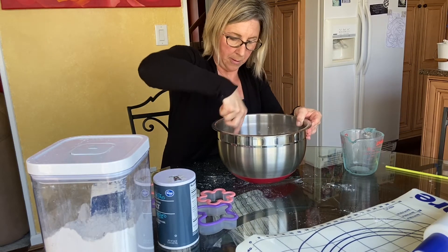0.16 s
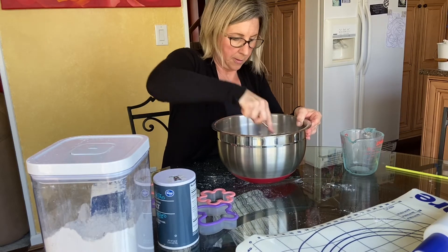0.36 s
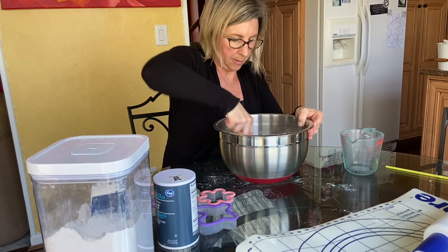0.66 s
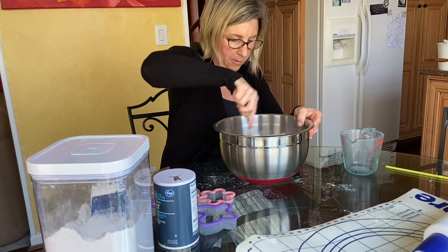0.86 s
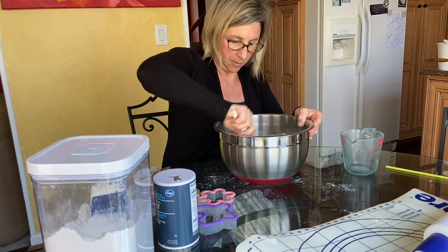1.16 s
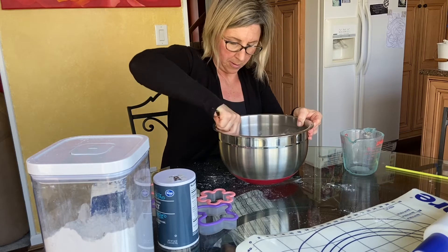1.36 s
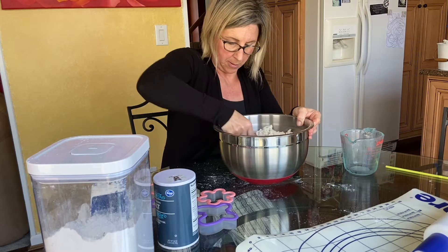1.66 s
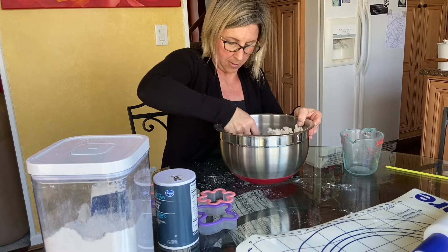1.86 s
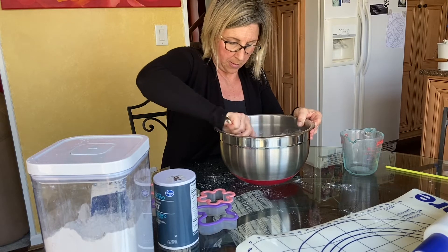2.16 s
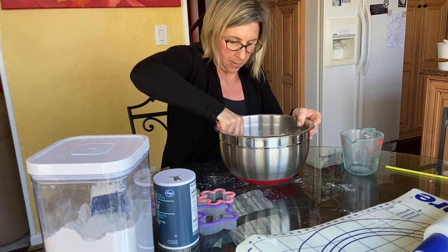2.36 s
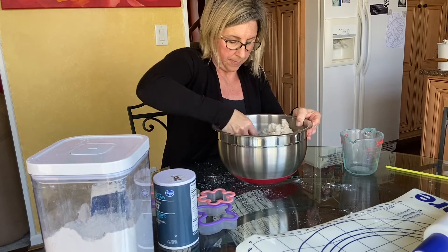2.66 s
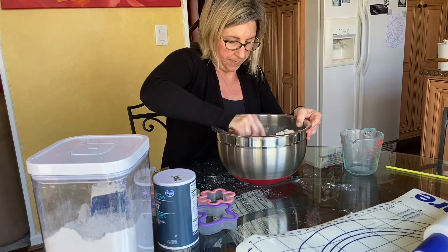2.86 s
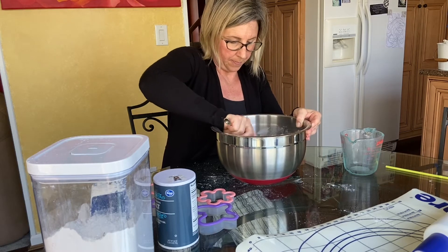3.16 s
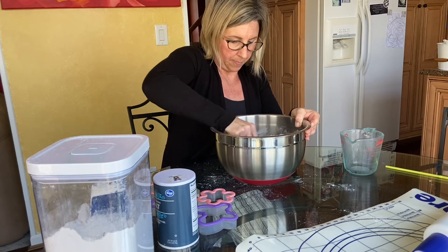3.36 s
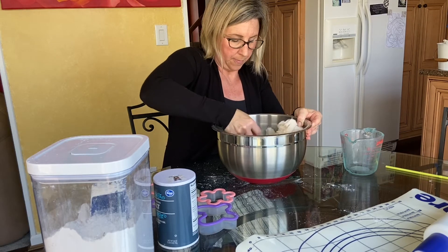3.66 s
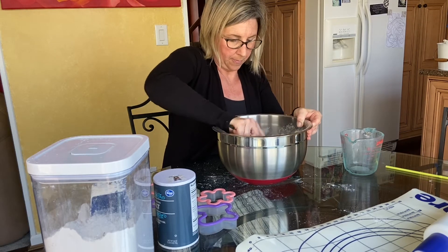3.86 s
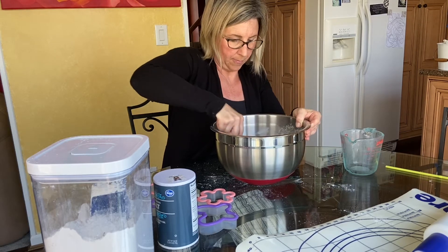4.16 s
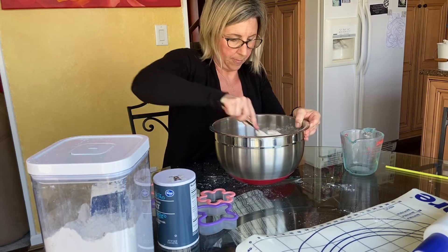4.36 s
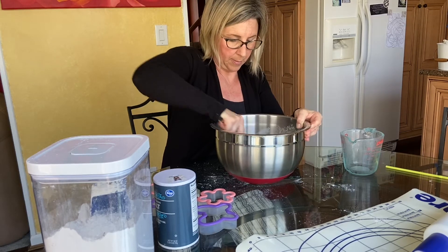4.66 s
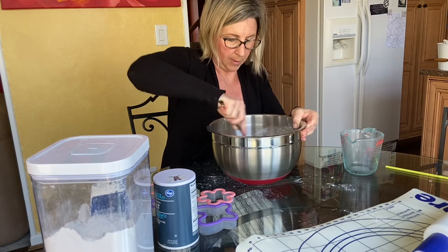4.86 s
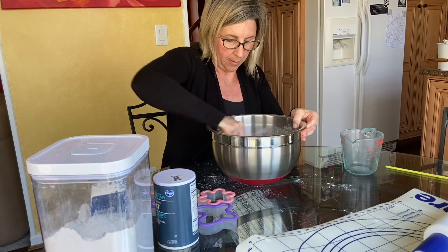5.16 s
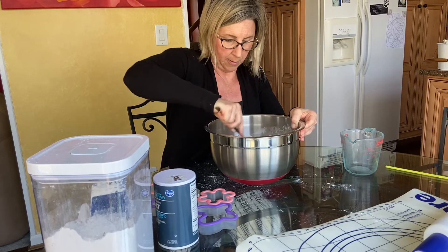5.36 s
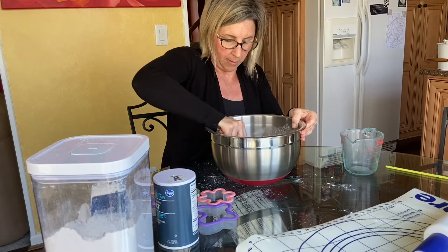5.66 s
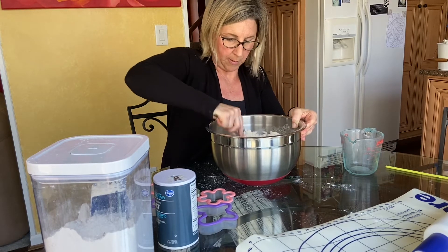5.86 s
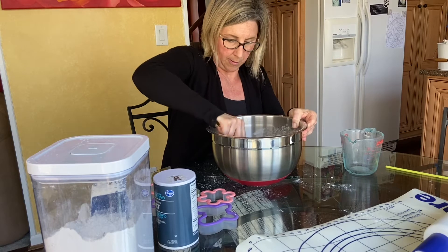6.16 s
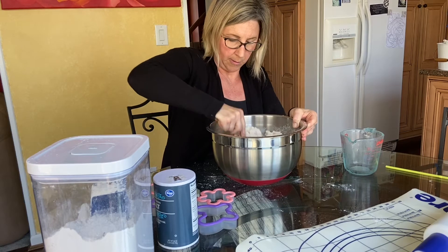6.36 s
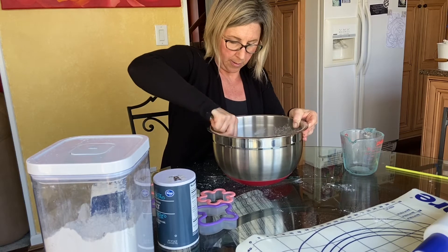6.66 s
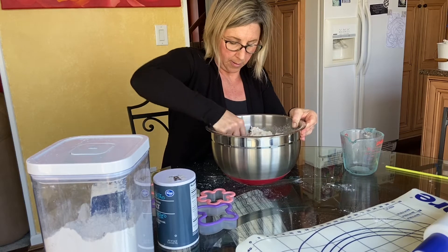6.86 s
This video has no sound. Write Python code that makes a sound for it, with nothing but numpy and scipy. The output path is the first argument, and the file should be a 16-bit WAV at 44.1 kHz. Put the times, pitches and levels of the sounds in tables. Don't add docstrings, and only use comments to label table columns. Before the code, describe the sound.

Gritty metallic scrapes and clanks of a spoon stirring stiff dough in a metal bowl, pausing between strokes, over faint fridge hum.

```python
import sys
import numpy as np
from scipy import signal
from scipy.fft import rfft, irfft
from scipy.io import wavfile
from scipy.ndimage import uniform_filter1d

SR = 44100
rng = np.random.default_rng(int(sys.argv[2]) if len(sys.argv) > 2 else 0)


def undo_db(level):
    steps = np.asarray(level, float) / 20
    return 10 ** steps


def wav_record(signal):
    frames = np.transpose(np.atleast_2d(signal))
    bounded = np.clip(frames, -1, 1)
    quanta = np.round(bounded * 32767).astype(np.int16)
    wavfile.write(sys.argv[1], SR, quanta)


N = 308259


def evened(x):
    return x / np.sqrt(np.mean(x ** 2) + 1e-20)


def read(points, hz):
    f, value = np.transpose(points)
    return np.interp(np.log(hz + 1), np.log(f + 1), value)


def add(mix, start_s, sound):
    part = mix[..., round(start_s * SR):][..., :sound.shape[-1]]
    part += sound[..., :part.shape[-1]]


def band(x, lo_hz, hi_hz):
    return signal.sosfilt(signal.butter(4, [lo_hz, hi_hz], "band", fs=SR, output="sos"), x)


def colour(points):
    gain_db = np.maximum(read(points, abs(np.fft.fftfreq(4096, 1 / SR))), -100)
    log_gain = np.log(undo_db(gain_db))
    return np.fft.ifft(np.exp(np.conj(signal.hilbert(log_gain)))).real[:2048]


# frequency in Hz, level in dB per Hz.
GRIT_BODY = [(3000, -15), (4400, 1), (5300, 6), (5500, 9.5), (6200, 12.5), (7200, 8), (8500, 0),
             (8850, -47)]
# frequency in Hz, width in Hz, level in dB.
HIGH_WALL_MODES = [(5440, 90, 3), (5560, 60, -2), (5770, 70, 3), (5900, 60, -2), (6040, 60, 4),
                   (6205, 45, 4), (6340, 60, 0), (6495, 50, 1), (6775, 90, 2), (7050, 80, 0),
                   (7200, 80, -1), (7420, 90, 0), (7650, 100, -1), (7900, 120, 0)]
# frequency in Hz, level in dB per Hz.
DRAG_BODY = [(200, -30), (350, -2), (550, 0), (800, 1.5), (1200, 3), (1700, -1), (2200, 3), (3000, -0.5),
             (4000, 0.5), (5500, -0.5), (9000, -11.5)]
# frequency in Hz, width in Hz, level in dB.
LOW_WALL_MODES = [(405, 45, 0), (495, 35, 1), (602, 35, 1), (725, 40, 1), (790, 50, -3), (900, 40, -4),
                  (1035, 30, 0), (1325, 60, 1), (1530, 40, -4), (2030, 55, 3), (2345, 70, 2), (2920, 60, 0),
                  (3400, 80, -3), (4160, 60, 1)]
# frequency in Hz, level in dB per Hz.
SPOON_METAL = [(3600, -24), (4450, -9), (4620, 5), (5000, -2), (5800, -30)]
# frequency in Hz, width in Hz, level in dB.
SPOON_MODES = [(4600, 90, -2), (4700, 70, 1), (4830, 110, -3), (4990, 130, -5)]
# frequency in Hz, level in dB per Hz.
FINE_GRIT = [(7500, -65.5), (8500, 4.5), (11000, -2), (13000, -2), (15700, -3), (15950, -83)]
# frequency in Hz, level in dB per Hz.
DUST_BODY = [(5500, -39), (6600, -3.5), (7300, 5), (8100, -2), (8500, -17), (9000, -78)]


def strokes():
    grit_db, drag_db, fine_db, spoon_db, dust_db, hardness_db = controls()
    salt = grains(14000, 2.5, 2.6, 0.006)
    grit_wall = wall(GRIT_BODY, HIGH_WALL_MODES, -2.3, uneven_db=9.5, count=4)
    grit = rub(salt, grit_db + 0.5, grit_wall, 5570, 6850)
    spoon_metal = wall(SPOON_METAL, SPOON_MODES, -5, count=2)
    spoon = rub(np.roll(salt, 99), spoon_db - 2.5, spoon_metal, 4400, 5100)

    lumpy = grains(7000, 2.4, 2.1, 0.0071)
    drag_wall = wall(DRAG_BODY, LOW_WALL_MODES, -6, uneven_db=3, count=4)
    drag = rub(lumpy, drag_db + 4, drag_wall, 700, 3800)
    soft = signal.lfilter(*signal.butter(1, 1500, fs=SR), drag)
    drag = undo_db(-hardness_db) * soft + undo_db(hardness_db) * (drag - soft)

    fine = rub(salt, fine_db + 0.37, np.tile(colour(FINE_GRIT), (2, 1, 1)), 8370, 16600)
    dust_wall = wall(DUST_BODY, HIGH_WALL_MODES, -15, count=2)
    grit += rub(np.roll(salt, 333), dust_db + 9.5, dust_wall, 6000, 9000)
    return damped(grit + spoon + drag, patchy_db=2.1), fine


# start, rise, hold and lift in seconds, grit level in dB.
EDGE_SCRAPES = [(.427, 0.0077, 0.0057, 0.13, -30.5), (1.163, 0.045, .002, 0.15, -40.5),
                (1.24, 0.11, 0.37, .15, -50), (1.66, 0.058, .002, 0.066, -45),
                (2.262, 0.019, 0.039, 0.12, -45), (2.30, 0.074, .002, 0.032, -34),
                (2.385, .012, 0.035, 0.083, -45.5), (2.45, 0.097, 0.03, 0.2, -33.5),
                (3.243, 0.018, 0.0022, 0.6, -43.5), (3.39, 0.0031, 0.048, 0.14, -44.5),
                (3.47, 0.075, 0.0051, 0.09, -37.5), (3.986, 0.0019, 0.13, 0.059, -51.5),
                (4.507, 0.0045, 0.03, 0.04, -47), (4.58, 0.02, 0.12, 0.058, -54),
                (5.033, 0.018, 0.033, .05, -42.5), (5.06, 0.022, .005, 0.15, -35.5),
                (5.15, 0.031, 0.084, 0.086, -45), (5.487, .002, 0.06, .03, -66),
                (5.572, 0.003, 0.078, 0.11, -36.5), (5.70, 0.0099, 0.093, 0.11, -46.5),
                (6.056, 0.014, 0.061, .1, -36), (6.13, 0.03, 0.078, 0.3, -37.5),
                (6.574, 0.019, 0.0016, 0.11, -32), (6.64, 0.021, 0.033, 0.11, -40)]
# start, rise, hold and lift in seconds, drag level in dB.
WEIGHT_PRESSES = [(.427, 0.0048, 0.024, 0.071, -36.5), (.5, .012, 0.046, 0.67, -63),
                  (1.163, 0.005, 0.54, 0.074, -59.5), (2.25, 0.039, 0.0093, 0.24, -40.5),
                  (2.39, 0.018, 0.18, 0.17, -53), (3.243, 0.013, 0.0018, 0.38, -43),
                  (3.39, 0.0034, 0.13, 0.18, -49.5), (3.987, 0.0047, 0.093, 0.1, -45),
                  (4.511, 0.0084, 0.0017, 0.063, -51), (4.57, 0.069, 0.057, 0.063, -46),
                  (5.036, 0.096, 0.055, 0.16, -46), (5.58, 0.057, 0.058, 0.19, -46),
                  (6.06, 0.081, 0.039, 0.23, -41.5), (6.6, 0.031, 0.058, 0.11, -46.5)]
# start, rise, hold and lift in seconds, ring level in dB.
SPOON_SINGS = [(.427, 0.021, .002, 0.066, -25), (1.42, 0.05, 0.24, .05, -51.5),
               (2.4, 0.066, 0.06, 0.068, -38), (3.243, 0.032, .002, 0.1, -35.5),
               (3.39, .012, 0.15, 0.17, -46.5), (3.987, .003, .002, .1, -59),
               (4.58, 0.033, 0.05, 0.045, -51), (5.05, 0.03, .01, 0.12, -36), (5.18, 0.026, .002, .05, -41),
               (5.25, 0.022, .002, 0.026, -38.5), (5.6, 0.018, 0.023, 0.23, -44),
               (6.12, 0.0058, 0.06, 0.24, -32.5)]


def controls():
    t = np.arange(0, N / SR + 0.001, 0.001)
    edge = contact(EDGE_SCRAPES, t, onset_db=-15)
    weight = contact(WEIGHT_PRESSES, t, onset_db=-16)
    sing = contact(SPOON_SINGS, t, onset_db=-15)
    loose, dust = slides(t)

    grit = edge + loose + undo_db(-82) ** 2
    light = loose * undo_db(-14.5) ** 2 + undo_db(-86) ** 2
    firm_db, fine_slope_db_per_db = -43.5, 0.98
    fine = (edge / undo_db(firm_db) ** 2) ** fine_slope_db_per_db * undo_db(firm_db - 13.5) ** 2
    fine = fine + weight * undo_db(-41) ** 2 + dust
    spoon = sing + grit * undo_db(-15) ** 2
    press_hard_db, slide_hard_db = -4.5, -8
    hard_db = (weight * press_hard_db + light * slide_hard_db) / (weight + light)

    levels_db = [10 * np.log10(p) for p in (grit, weight + light, fine, spoon, dust + 1e-12)]
    return [np.interp(np.arange(N) / SR, t, curve) for curve in levels_db + [hard_db]]


def contact(rows, t, onset_db):
    entry_s, lift_db = 0.00039, -32.5
    start, rise, hold, lift, db = np.array(rows).T[:, :, None]
    u = t - start
    onset = onset_db * np.clip(1 - u / rise, 0, 1)
    release = lift_db * np.maximum(u - rise - hold, 0) / lift
    entry = np.clip(u / entry_s, 0, 1) ** 2
    return (undo_db(db + onset + release) ** 2 * entry).sum(0)


# middle and half length in seconds, grit level in dB, finest grit in dB over grit.
LOOSE_SLIDES = [(0.06, 0.069, -60.5, -5), (0.29, 0.022, -70.5, -2.5), (0.675, 0.058, -64, -8),
                (0.852, 0.025, -86, 3), (1.017, 0.015, -69.5, -13.5), (1.838, 0.065, -63.5, -8.5),
                (1.993, 0.062, -78, -8), (2.153, 0.013, -73.5, -10), (2.955, 0.16, -64, -10.5),
                (3.216, 0.037, -59, -10.5), (3.748, 0.064, -64.5, -10), (3.906, 0.013, -63.5, -7.5),
                (4.182, 0.015, -62.5, -6.5), (4.358, 0.028, -66.5, -8.5), (4.503, .008, -85, -9),
                (4.795, 0.012, -61.5, -7.5), (4.91, 0.009, -68.5, -6.5), (5.01, 0.028, -73, -6),
                (5.386, 0.042, -68.5, -9.5), (5.55, 0.035, -64.5, -19), (6.006, 0.059, -61, -10.5),
                (6.546, 0.027, -64.5, -10), (6.81, 0.036, -56.5, -8.5), (6.946, 0.06, -68, -11),
                (3.545, 0.013, -80, 0), (4.543, 0.0066, -69.5, 9), (4.702, 0.011, -67.5, 5),
                (6.63, 0.0067, -66, -6)]


def slides(t):
    fade_db_per_s = 237
    middle, half, db, fine_db = np.array(LOOSE_SLIDES).T[:, :, None]
    outside_s = np.maximum(abs(t - middle) - half, 0)
    power = undo_db(db - fade_db_per_s * outside_s) ** 2
    return power.sum(0), (power * undo_db(fine_db) ** 2).sum(0)


def grains(per_s, spread_db, clump_db, clump_s):
    size = undo_db(spread_db * np.minimum(rng.exponential(1, N), 4)) * rng.standard_normal(N)
    width = round(clump_s * SR)
    clumps = uniform_filter1d(uniform_filter1d(rng.standard_normal(N), width), width)
    crushed = rng.random(N) < per_s / SR
    return evened(size * crushed * undo_db(clump_db * evened(clumps)))


def wall(points, modes, modes_db, uneven_db=-19.0, apart=0.78, count=3):
    t = np.arange(SR // 16) / SR
    hz, width, db = np.array(modes, float).T[:, :, None]
    rings = undo_db(db) * np.sqrt(width) * np.exp((2j * hz - width) * np.pi * t)
    rings = rings * (1 - np.exp(-t / 0.000043))
    patch = undo_db(uneven_db * rng.standard_normal((count, 1, len(modes))))
    patch /= np.sqrt((patch ** 2).mean(0))
    step = 2 * np.pi * rng.random(patch.shape) + apart * rng.standard_normal((count, 2, len(modes)))
    body = colour(points)
    rung = (patch * np.exp(1j * step) @ rings).real
    rung = signal.fftconvolve(rung, body[None, None], axes=2)[..., :len(t)]
    return evened(np.pad(body, (0, len(t) - len(body)))) + undo_db(modes_db) * evened(rung)


def rub(push, level_db, patches, lo_hz, hi_hz, turns_per_s=2.3):
    count = len(patches)
    phase = np.pi * (turns_per_s * np.arange(N) / SR + np.arange(count)[:, None] / count)
    share = np.sin(phase) ** 2 * np.sqrt(8 / 3 / count)
    scale = np.std(band(signal.oaconvolve(push[:SR], patches[0, 0]), lo_hz, hi_hz)[:SR])
    force = (push * undo_db(level_db) * share)[:, None]
    return signal.oaconvolve(force, patches, axes=2).sum(0)[:, :N] / scale


def damped(x, patchy_db, wide=5, long=14):
    z = signal.stft(x, nperseg=256, noverlap=128)[2]
    patches = rng.standard_normal(z.shape[:0:-1]).T
    patches = uniform_filter1d(uniform_filter1d(patches, wide, 0), long, 1)
    patches = evened(uniform_filter1d(patches, long, 1))
    return signal.istft(z * undo_db(patchy_db * patches), nperseg=256, noverlap=128)[1][:, :N]


def ring(db, hz, t60_s, rise_s=0.00033, lift=0, step=0):
    sag_s = 0.0027
    t = np.arange(SR // 3) / SR
    turns = hz * (t + lift * sag_s * (1 - np.exp(-t / sag_s)))
    return undo_db(db - 60 * t / t60_s) * (1 - np.exp(-t / rise_s)) * np.sin(2 * np.pi * turns + step)


# start in seconds, peak in dB, loaded wall pitch in Hz, t60 in seconds, crack in dB.
WALL_KNOCKS = [(0.4256, -17, 562, 0.09, -16.5), (0.446, -37, 740, 0.083, -24), (0.466, -39, 690, 0.12, -28),
               (1.162, -42.5, 327, 0.073, -29), (2.245, -28.5, 537, 0.073, -20),
               (2.258, -33, 450, 0.022, -18), (3.242, -28.5, 293, 0.083, -21),
               (3.253, -30.5, 263, 0.092, -28), (3.268, -34, 806, 0.37, -30), (3.986, -37, 795, 0.42, -19),
               (4.509, -41, 288, 0.19, -28), (5.228, -33, 296, 0.037, -20), (5.036, -46, 397, 0.1, -9)]


def knocks():
    out, t = np.zeros((2, N)), np.arange(2000) / SR
    ports = 0.63 * np.array([[1], [-1]])
    for s, db, hz, t60, crack_db in WALL_KNOCKS:
        add(out, s, ring(db + 7.0, 0.745 * hz, 0.028, 0.0022, lift=0.93))
        for mode_hz, _, mode_db in LOW_WALL_MODES[:9]:
            detune, step = rng.standard_normal(2)
            level_db = db - 11.0 + mode_db - 12 * abs(np.log2(mode_hz / (1.27 * hz)))
            mode_t60 = t60 * (500 / mode_hz) ** 0.41
            add(out, s, ring(level_db, mode_hz * (1 + 0.029 * detune), mode_t60, 0.0004, step=step * ports))
        crack = band(rng.standard_normal(len(t)), 800, 15000)
        add(out, s, undo_db(db + crack_db - 60 * t / 0.038) * crack)
    return out


def crunches(rows, gain_db, t60_s, sharpness):
    rise_s, early_s, ports_apart = 0.008, 0.003, 0.29
    out, t = np.zeros((2, N)), np.arange(5000) / SR
    noise = rng.standard_normal((len(rows), 2, len(t)))
    for (s, db, hz), (both, apart) in zip(rows, noise):
        shape = (1 - np.exp(-t / rise_s)) * undo_db(db + gain_db - 60 * t / t60_s)
        heard = both + ports_apart * np.array([apart, -apart])
        spot = signal.lfilter(*signal.iirpeak(hz, sharpness, SR), heard)
        spot = signal.lfilter(*signal.iirpeak(hz, sharpness / 2, SR), spot)
        add(out, s - early_s, shape * evened(spot))
    return out


# start in seconds, peak in dB, wall pitch in Hz.
SALT_BITES = [(0.4399, -24, 4720), (0.452, -39, 6300), (1.1747, -34, 5330), (1.1872, -33, 5750),
              (1.2151, -22, 6200), (1.695, -33, 5600), (2.2787, -39, 6140), (2.33, -31, 6400),
              (2.372, -25, 5700), (2.4848, -28.5, 7480), (2.528, -27, 6050), (2.545, -19, 7000),
              (2.575, -25, 7100), (2.61, -38, 5540), (3.268, -27, 5700), (3.3962, -38, 4650),
              (3.5219, -25, 6000), (3.535, -31, 6100), (3.55, -30, 7700), (4.0407, -47, 6100),
              (4.5222, -51, 4900), (4.5421, -42, 6000), (4.6932, -34, 4540), (4.7023, -34, 4330),
              (5.0799, -36, 6250), (5.0918, -26, 6300), (5.115, -40, 6260), (5.2175, -30, 4240),
              (5.2714, -30, 6030), (5.5832, -24, 5800), (5.6082, -33, 5340), (5.622, -28, 6100),
              (5.643, -25, 6340), (5.66, -28, 6500), (5.7798, -33.5, 5950), (6.0746, -18.5, 5700),
              (6.09, -21, 6800), (6.099, -18, 5900), (6.113, -15, 6200), (6.1424, -23, 6360),
              (6.1729, -17, 6100), (6.2, -32, 4800), (6.2322, -20, 6060), (6.29, -39, 5000),
              (6.5924, -28, 7000)]


def bites():
    return crunches(SALT_BITES, -5, t60_s=0.062, sharpness=11)


# start in seconds, peak in dB, wall pitch in Hz.
DOUGH_LUMPS = [(0.432, -26, 697), (0.45, -26, 737), (0.5, -36, 488), (2.250, -29, 973),
               (2.293, -27.5, 2060), (2.300, -33, 1170), (2.345, -33, 890), (2.44, -45, 960),
               (2.506, -37.5, 2060), (2.6, -37.5, 1020), (3.242, -30.5, 480), (3.268, -25, 746),
               (3.29, -35, 1300), (3.402, -36.5, 624), (3.47, -41, 1710), (3.988, -31.5, 916),
               (3.992, -33.5, 512), (4.05, -38, 1064), (4.51, -45.5, 780), (4.52, -46, 4100),
               (4.632, -34, 1400), (4.68, -55, 2300), (5.05, -48, 3100), (5.123, -39, 1040),
               (5.19, -38, 2320), (5.21, -37, 3870), (5.627, -43, 1280), (5.654, -32.5, 1010),
               (5.7, -35, 1250), (6.122, -41, 524), (6.145, -29.5, 1006), (6.14, -32, 3620),
               (6.18, -31, 1320), (6.621, -37, 500), (6.642, -35.5, 2400)]


def lumps():
    return crunches(DOUGH_LUMPS, -5.5, t60_s=0.11, sharpness=15.4)


# start in seconds, peak in dB, pitch in Hz, t60 in seconds.
TABLE_THUMPS = [(0.419, -33, 304, 0.092), (0.428, -30, 228, 0.055), (0.432, -39, 115, 0.18),
                (0.89, -36, 114.6, 0.12), (2.151, -34.5, 117.5, 0.16), (2.197, -40, 84.3, 0.42),
                (3.242, -45, 289.4, 0.057), (5.2368, -29, 118, 0.11), (4.447, -39, 92.5, 0.11),
                (5.535, -30, 119.5, 0.13), (5.622, -30, 125.5, 0.098), (6.138, -25, 114, 0.031),
                (6.617, -23, 199, 0.039)]


def thumps():
    out = np.zeros((2, N))
    for s, db, hz, t60 in TABLE_THUMPS:
        add(out, s, ring(db, hz, t60, 0.003))
        add(out, s, ring(db - 16, 1.547 * hz, 2 * t60, 0.0094))
        add(out, s, ring(db - 13, 2.245 * hz, 0.86 * t60, 0.0021))
    return out


# start in seconds, peak in dB.
GRAIN_TICKS = [
    (.791, -48),
    (.925, -70),
    (1.010, -62),
    (1.162, -43),
    (2.09, -66),
    (2.141, -45),
    (3.988, -41),
    (5.487, -62),
]


def ticks():
    out, t = np.zeros((2, N)), np.arange(2000) / SR
    for s, db in GRAIN_TICKS:
        add(out, s, undo_db(db - 60 * t / 0.0045) * band(rng.standard_normal(len(t)), 1200, 16500))
    return out


# start in seconds, level in dB, pitch in Hz, t60 in seconds.
RIM_PINGS = [
    (2.95, -89, 3350, .3),
    (6.39, -78, 3500, .24),
]


def pings():
    out = np.zeros((2, N))
    for s, db, hz, t60 in RIM_PINGS:
        add(out, s, ring(db, hz, t60, 0.012))
        add(out, s, ring(db + 15, hz + 40, t60, 0.03))
        add(out, s, ring(db + 12, hz - 55, t60, 0.02))
    return out


# frequency in Hz, t60 in seconds.
KITCHEN_T60 = [(200, 0.32), (1000, 0.35), (4000, 0.26), (12000, 0.18)]


def kitchen(x, turns_per_s=1.7):
    taps = np.zeros((2, 2, SR // 2))
    at = np.arange(100, SR // 2 - 20, 20) + rng.integers(0, 20, (2, 2, (SR // 2 - 101) // 20))
    np.put_along_axis(taps, at, rng.choice([-1., 1.], at.shape), 2)
    hz, t, z = signal.stft(taps, SR, nperseg=256)
    decay = undo_db(-60 * t / read(KITCHEN_T60, hz)[:, None])
    tail = signal.istft(z * decay, SR, nperseg=256)[1]
    phase = 2 * np.pi * turns_per_s * np.arange(N) / SR
    fed = x * np.array([np.cos(phase), np.sin(phase)])[:, None]
    return signal.fftconvolve(fed, tail / np.linalg.norm(tail[0, 0]), axes=2).sum(0)[:, :N]


# frequency in Hz, level in dB per Hz.
ROOM_FLOOR = [(15, -43), (25, 3), (44, -22), (65, 7), (92, -1.5), (135, 4.5), (154, -13.5), (176, -5.5),
              (210, -11.5), (299, -8), (582, -20), (1380, -32), (1750, -51), (3920, -54), (5000, -94),
              (6500, -88.5), (11000, -120)]
# frequency in Hz, left-right likeness from 0 to 1.
PORT_LIKENESS = [(52, 0.99), (80, 0.8), (110, 0.067), (160, 0.084), (270, 0.64), (950, 0.021), (5000, 0.14)]
# frequency in Hz, level in dB, width in Hz.
FRIDGE_HUM = [
    (59.1, -58.5, 0.77),
    (117.5, -66.5, 13),
    (185.1, -65, 7.5),
    (304, -72, 3.5),
]


def air():
    frames, hz = N // 512 + 5, np.fft.rfftfreq(2048, 1 / SR)
    a, b, c, d, patches = rng.standard_normal((frames, 1025, 5)).T
    patches = evened(uniform_filter1d(uniform_filter1d(patches, 5, 0), 8, 1))
    same = np.clip(read(PORT_LIKENESS, hz), -1, 1)[:, None]
    left = a + 1j * b
    right = same * left + np.sqrt(1 - same ** 2) * (c + 1j * d)
    z = np.array([left, right]) * undo_db(read(ROOM_FLOOR, hz)[:, None] + 2.0 * patches)
    out = undo_db(-49.5) * evened(signal.istft(z, nperseg=2048, noverlap=1536)[1][:, :N])

    t = np.arange(N) / SR
    for line_hz, db, width_hz in FRIDGE_HUM:
        waver = uniform_filter1d(rng.standard_normal((2, N)), round(SR / width_hz))
        sway = 2.3 + evened(waver[0]) + 1j * evened(waver[1])
        out += undo_db(db) * evened((sway * np.exp(2j * np.pi * line_hz * t)).real)
    return out


def scene():
    scrape, fine = strokes()
    blows = knocks() + thumps() + ticks() + pings() + bites() + lumps()
    near = undo_db(-11.5) * scrape + blows + fine
    wet = kitchen(undo_db(-12.5) * scrape + undo_db(-6.0) * blows + undo_db(-0.5) * fine)
    return near * undo_db(np.array([[0.3], [-0.3]])) + wet + air()


def band_limit(x):
    return signal.sosfilt(signal.butter(12, 17100, fs=SR, output="sos"), x)


def record(dry):
    split_hz, aligned_hz, lag_s, edge_hz = 8300, 6920, 1 / 4200, 15930
    hz, z = np.fft.rfftfreq(N, 1 / SR), rfft(dry, axis=1)
    top = np.clip((hz - split_hz) / 300, 0, 1)
    late = z[0] * np.exp(-2j * np.pi * (hz - aligned_hz) * lag_s)
    z[1] = (1 - top) * z[1] + top * late
    z *= undo_db(-40 * np.clip((hz - edge_hz) / 60, 0, 1))
    return band_limit(irfft(z, N, axis=1))


dry = scene()
out = record(dry)
wav_record(out)
```